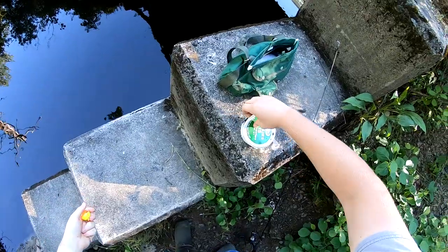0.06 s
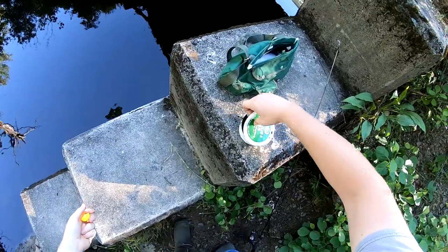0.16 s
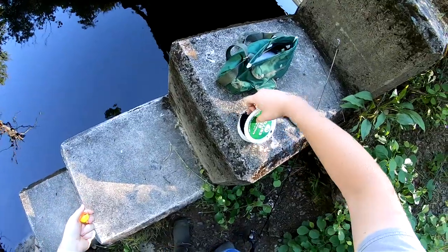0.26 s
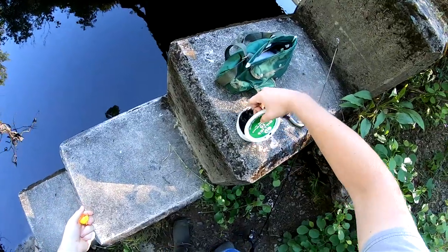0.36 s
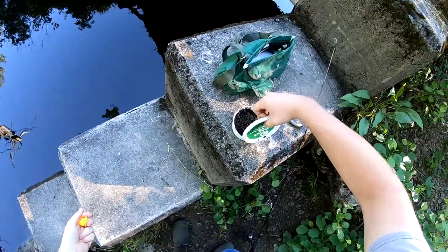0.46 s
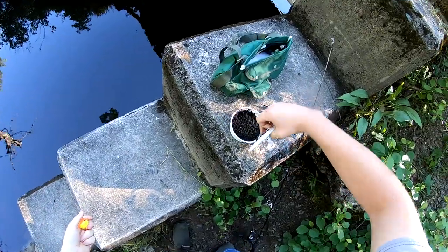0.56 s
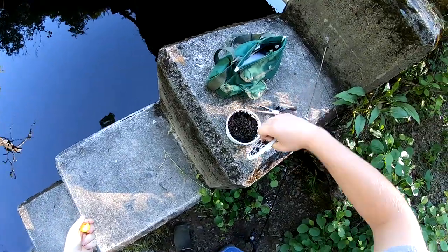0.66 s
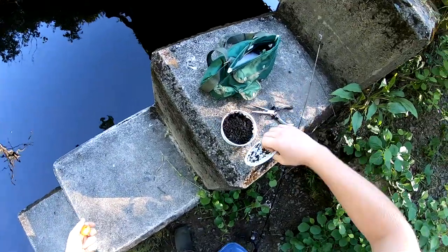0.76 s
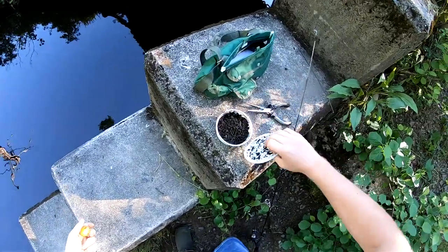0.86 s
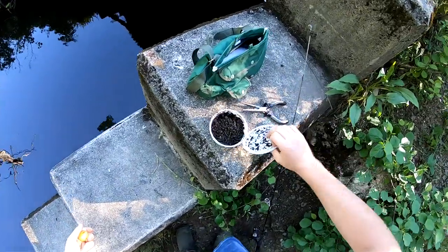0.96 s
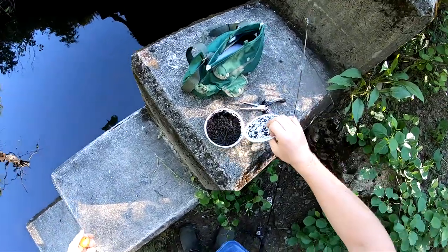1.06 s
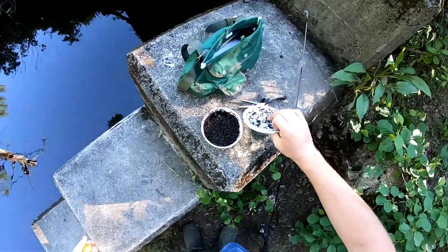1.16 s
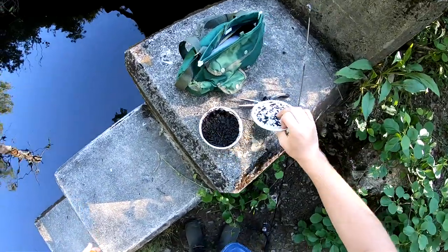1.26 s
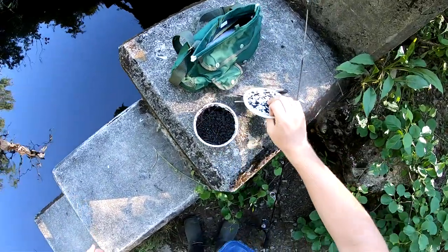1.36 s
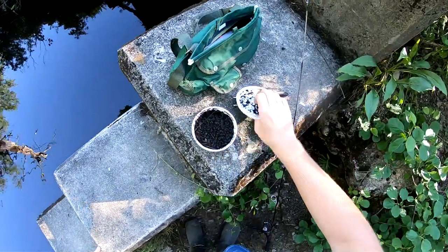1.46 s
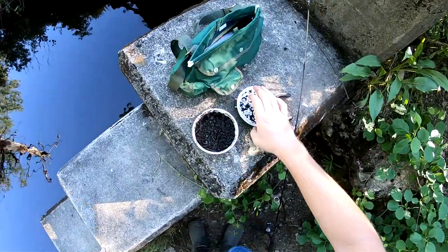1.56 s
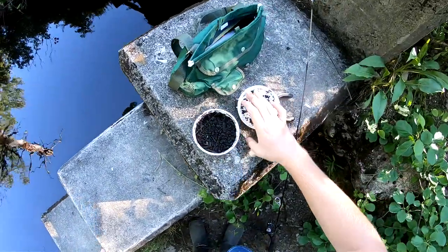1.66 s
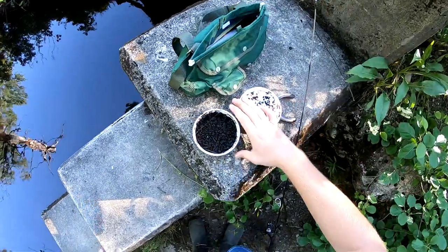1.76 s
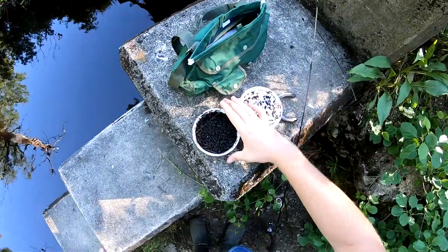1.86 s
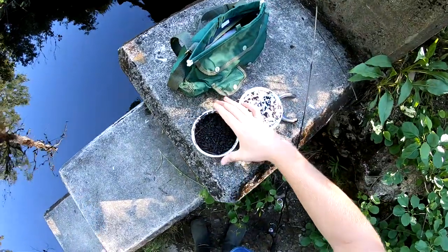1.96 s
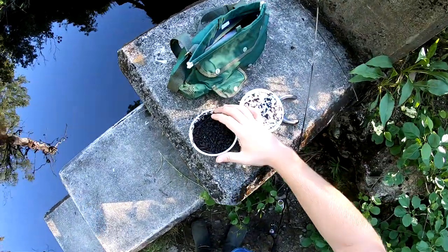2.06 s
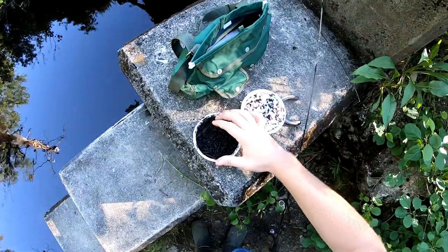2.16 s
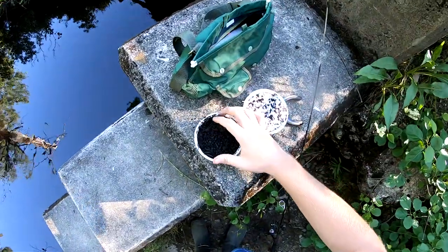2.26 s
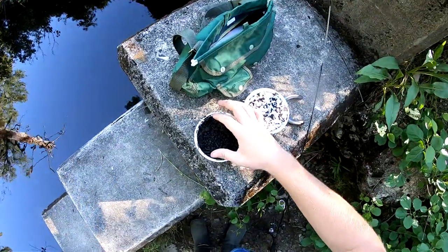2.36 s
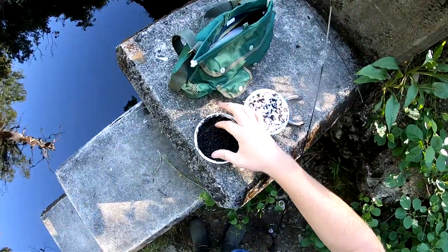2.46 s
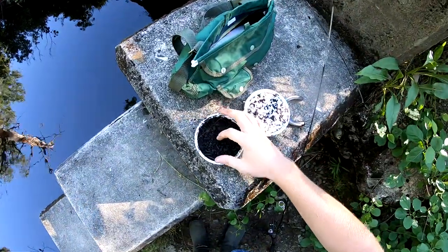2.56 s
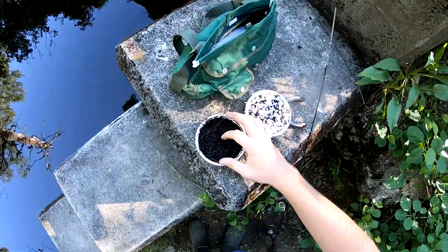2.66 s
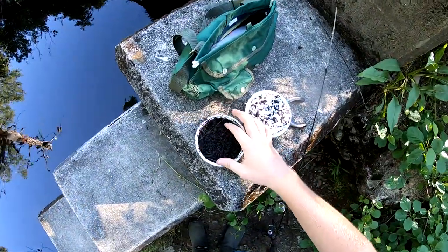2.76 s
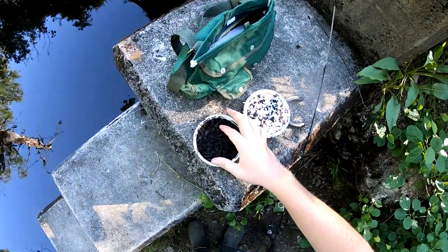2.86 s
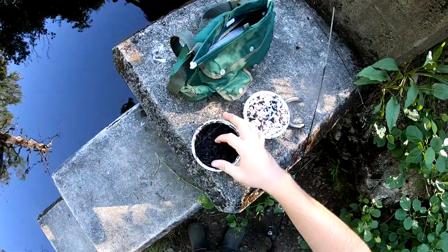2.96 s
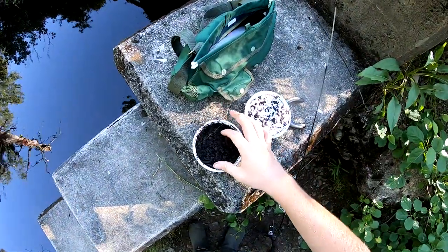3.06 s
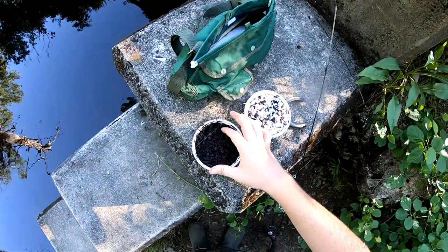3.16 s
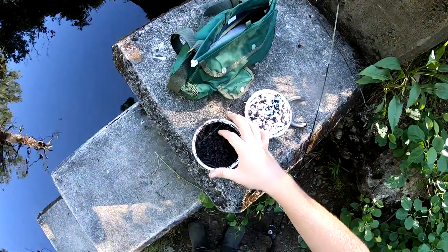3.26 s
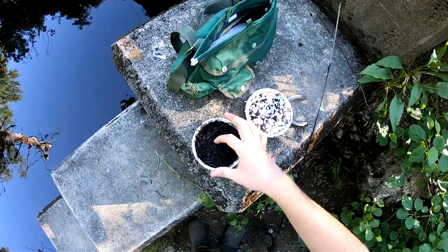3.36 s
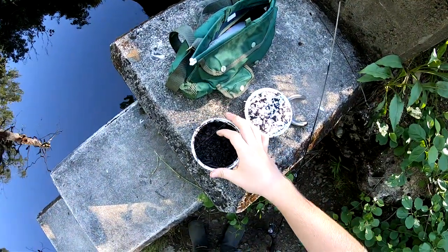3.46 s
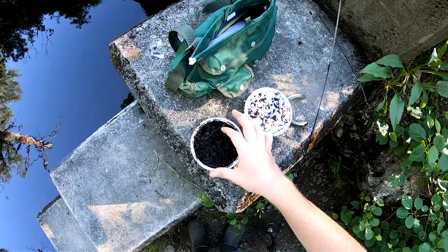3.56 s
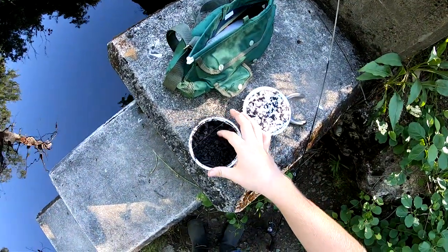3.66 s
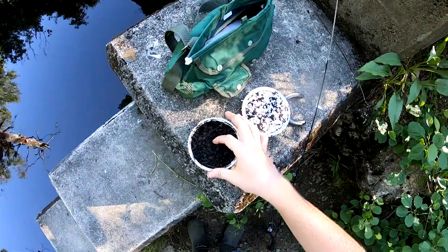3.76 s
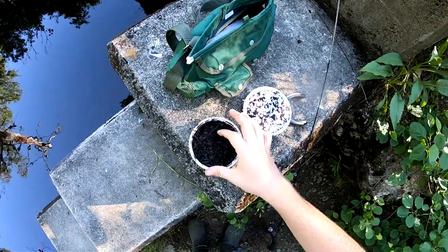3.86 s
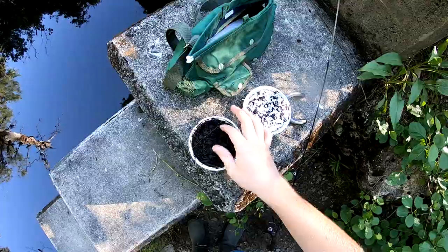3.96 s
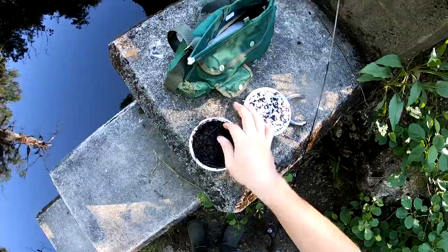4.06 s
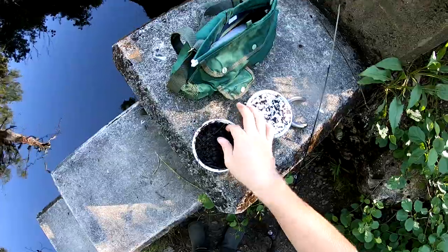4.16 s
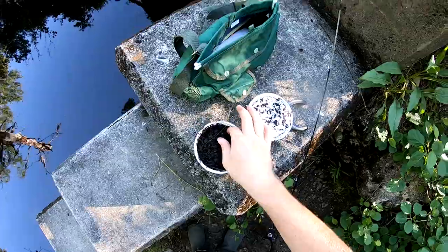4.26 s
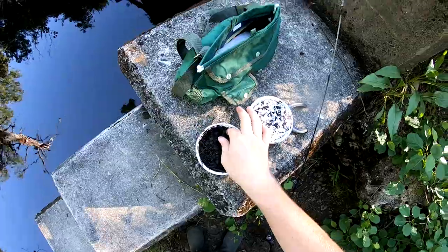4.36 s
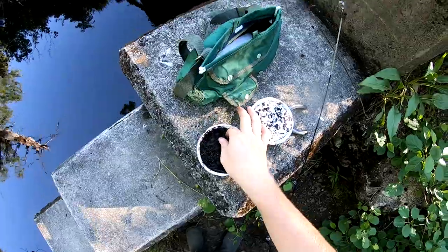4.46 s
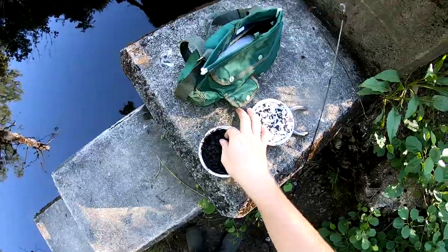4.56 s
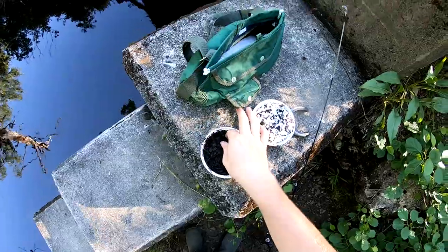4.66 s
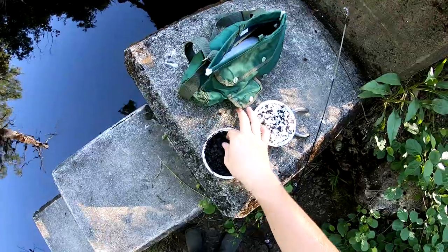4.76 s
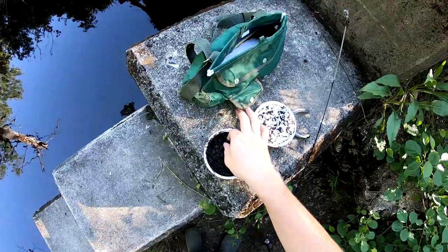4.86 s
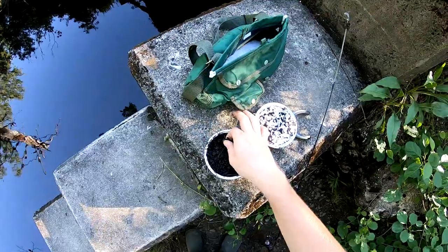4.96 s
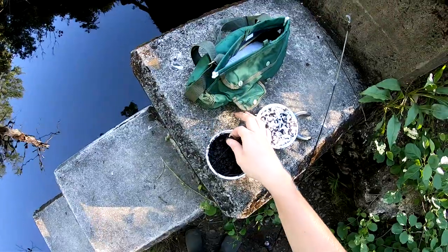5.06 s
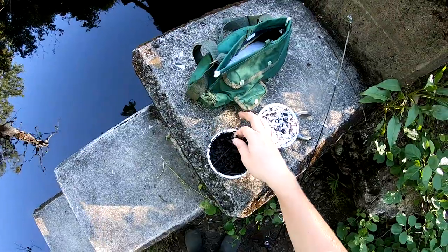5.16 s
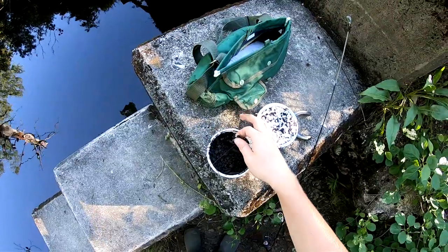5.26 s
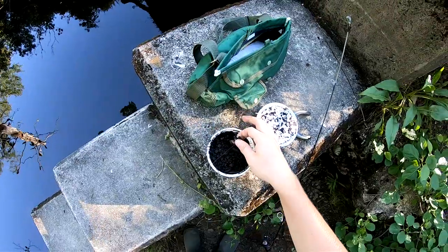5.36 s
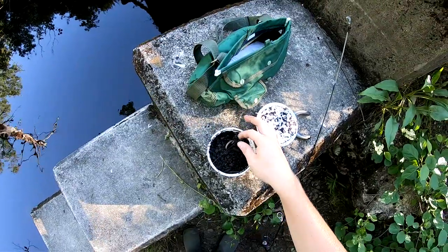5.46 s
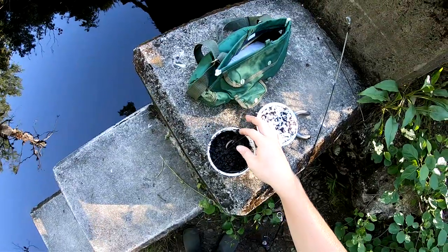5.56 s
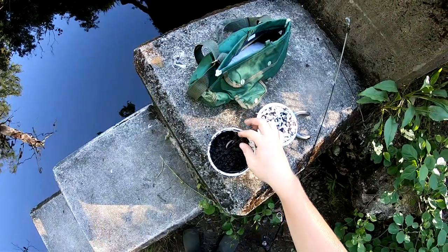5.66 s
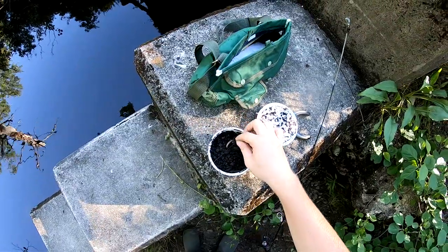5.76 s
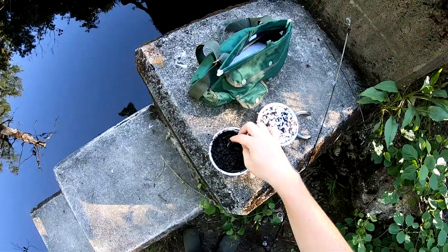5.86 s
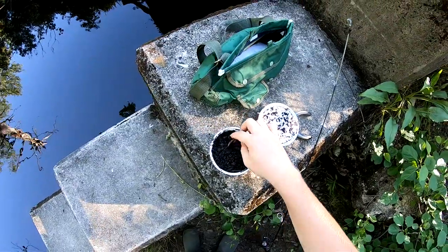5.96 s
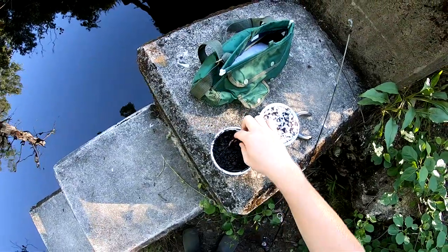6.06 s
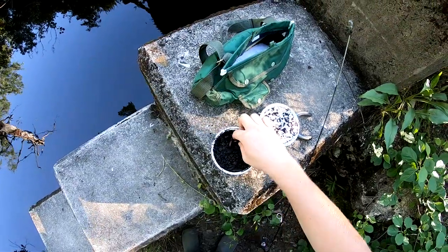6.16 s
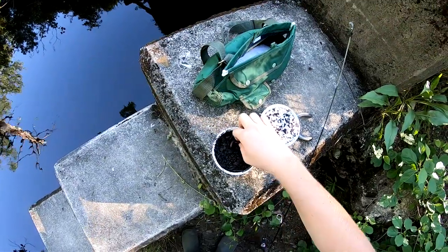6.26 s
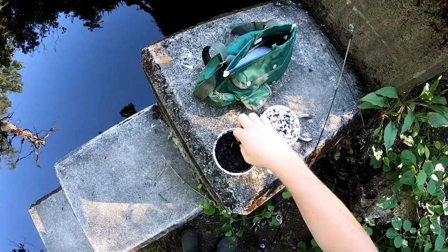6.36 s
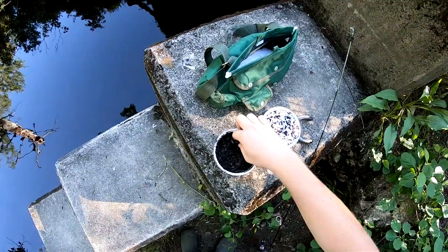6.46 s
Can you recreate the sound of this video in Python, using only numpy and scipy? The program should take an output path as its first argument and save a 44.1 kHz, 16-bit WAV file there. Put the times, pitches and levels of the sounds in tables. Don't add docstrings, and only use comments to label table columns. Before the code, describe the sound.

Close wearable stereo microphone, quiet open air: hard plastic cracks with hollow knocks come first, then cloth rubbing, another snap and a ringing rattle as the lid lands on a slab. After a lull, gritty scratching and tiny paired low-high ticks on a tub rim. Two birds whistle slurred notes with soft echoes from the trees; low puffs of breeze and steady faint water lie underneath.

```python
import sys
import numpy as np
from scipy import signal
from scipy.io import wavfile

SR = 44100
rng = np.random.default_rng(int(sys.argv[2]) if len(sys.argv) > 2 else 0)


def output_pcm(signal):
    pcm = np.clip(np.atleast_2d(signal).T, -1, 1) * 32767
    wavfile.write(sys.argv[1], SR, np.round(pcm).astype(np.int16))


def attenuation_scalar(level_db):
    decades = np.asarray(level_db, float) / 20
    return 10 ** decades


N = 287952
LID_OFF_S = 1.6
PORT_RING_HZ = 158


def rms_one(x):
    return x / np.sqrt(np.mean(x ** 2) + 1e-20)


def filtered(x, order, hz, kind="low"):
    return signal.sosfilt(signal.butter(order, hz, kind, fs=SR, output="sos"), x)


def in_time(rows):
    s, *columns = np.transpose(rows)
    return [np.interp(np.arange(N) / SR, s, c) for c in columns]


def at_hz(points, hz):
    point_hz, value = np.transpose(points)
    return np.interp(np.log(hz), np.log(point_hz), value)


def drift(rate):
    r = np.exp(-80 * np.pi * rate / SR)
    slow = signal.lfilter([1], [1, -2 * r, r * r], rng.standard_normal(N // 40 + 2002))[2000:]
    return np.interp(np.arange(N) / 40, np.arange(len(slow)), rms_one(slow))


def ring(clicks, hz, t60):
    r, w = attenuation_scalar(-60 / (t60 * SR)), 2 * np.pi * hz / SR
    return signal.lfilter([0, np.sin(w)], [1, -2 * r * np.cos(w), r * r], clicks + 1e-18)


def grains(per_s, spread_db):
    sizes = attenuation_scalar(spread_db * np.minimum(rng.exponential(1, N), 5)) * rng.choice([-1, 1], N)
    return sizes * (rng.random(N) < per_s / SR)


def swells(rows, rise_db_s, fall_db_s):
    t = np.arange(N) / SR
    efforts = []
    for s, hold, db in rows:
        rise = rise_db_s * np.maximum(s - t, 0)
        fall = fall_db_s * np.maximum(t - s - hold, 0)
        efforts.append(db - rise - fall)
    return np.max(efforts, axis=0)


def banded(white, spectrum, patchy_db, likeness):
    out, together = 0, drift(4)
    bottom, top = np.array(spectrum)[[0, -1], 0]
    edges = bottom * 2 ** np.arange(0, np.log2(top / bottom) + .2, .5)
    for k, (low, high) in enumerate(zip(edges, np.minimum(edges[1:], .45 * SR))):
        mid, side = filtered(white[k % 2], 2, [low, high], "band")
        hz = np.sqrt(low * high)
        alike = np.clip(at_hz(likeness, hz), -1, 1)
        flicker_db = patchy_db * (.7 * together + drift(15))
        gain = attenuation_scalar(at_hz(spectrum, hz) + flicker_db)
        out = out + gain * (np.sqrt(1 + alike) * mid + np.sqrt(1 - alike) * side * [[1], [-1]])
    return rms_one(out)


# pitch_hz, level_db
TUB_MODES = [(330, -19), (560, 0), (820, 5), (1050, 7), (1250, -2)]
# pitch_hz, level_db
LOOSE_MODES = [(800, -3), (1050, 0.5), (1450, -10), (1750, 9.5), (2200, -19.5)]
# delay_s, level_db
SLAB_ECHOES = [
    (.0021, -9),
    (.0036, -8),
]


def hits(events, crack_top_hz, cycles, thud_t60, tail_db, pan_db, shade_db):
    size = 1536
    out, t = np.zeros((2, N + size)), np.arange(size) / SR
    chance = rng.standard_normal
    for s, db, hz, thud_db, crack_db, rattle_ms in events:
        fade = np.exp(-1300 * t / max(rattle_ms, 1))
        kick = attenuation_scalar(tail_db) * chance(size) * np.abs(chance(size)) * fade
        kick[0] = 1
        for lag_s, echo_db in SLAB_ECHOES:
            lag = round(lag_s * SR * attenuation_scalar(chance()))
            kick[lag] += attenuation_scalar(echo_db + shade_db + 1.5 * chance()) * np.sign(chance())

        contact = ring(np.diff(kick, prepend=0), hz, 3 / hz)
        plate = ring(contact, hz, cycles / hz)

        thud = 0
        for mode_hz, mode_db in TUB_MODES if s < LID_OFF_S else LOOSE_MODES:
            uneven_db = 3 * chance() + 2 * chance() * np.array([[1], [-1]])
            thud = thud + attenuation_scalar(mode_db + uneven_db) * ring(kick, mode_hz * attenuation_scalar(.4 * chance()), thud_t60)
        if s > LID_OFF_S:
            thud = filtered(thud, 4, 720, "high") + attenuation_scalar(db / 2) * ring(kick, 220, 0.061)

        crack = [np.roll(kick, 1), kick] + .11 * chance((2, size)) * fade
        crack = filtered(crack, 2, [4200, crack_top_hz], "band")

        thud_at_ports = np.array([thud[0], np.roll(thud[1], 3)]) / np.abs(thud).max()
        body = plate / np.abs(plate).max() + attenuation_scalar(thud_db) * thud_at_ports
        lean_db = (pan_db + chance()) / 2
        sound = body * attenuation_scalar([[lean_db], [-lean_db]]) + attenuation_scalar(crack_db) * crack / np.abs(crack).max()
        i = round((s + .0011) * SR)
        out[:, i:i + size] += attenuation_scalar(db) * sound / np.abs(sound.mean(0)).max()
    return filtered(out[:, :N], 4, [185, 17500], "band")


# start_s, peak_db, ring_hz,
# thud_db and crack_db (relative to the ring)
PRYING = [(0.004, -23, 650, 8, -3), (0.027, -6.5, 2800, -2.5, 1.5), (0.137, -34, 1570, 7, -28),
          (0.1562, -21.5, 2630, -7, -3.5), (0.1704, -26, 2050, -1, -4), (0.1753, -19, 530, 9.5, -21),
          (0.1923, -34, 1210, 12, 28), (0.193, -12, 2020, 9.5, -4), (0.2015, -21.5, 1170, 11, 9),
          (0.197, -18, 950, -22, -25), (0.21, -36, 2490, 12, -13.5), (0.239, -32.5, 2500, -22, 0),
          (0.249, -29.5, 1300, 29, -21), (0.2595, -28.5, 480, -6, -9), (0.272, -23, 1200, 21.5, 10.5),
          (0.294, -39, 3200, 9, -6), (0.3171, -27.5, 3130, 5, -8), (0.305, -30.5, 1370, 26, -14),
          (0.322, -33, 1290, 1, -20), (0.342, -48, 1200, 0, -11), (0.52, -37, 2540, 0, -3),
          (0.526, -35, 1390, -1, 2), (0.535, -47, 1800, -17, -12), (0.55, -18, 2720, -41, -5),
          (0.579, -33.5, 2980, -32, 0), (1.2128, -10.5, 9500, -26, -6.5), (1.4577, -34.5, 2480, 4, -18),
          (1.521, -35.5, 1510, -24, -35.5), (1.535, -5.5, 2400, -1, 10.5)]
# start_s, peak_db, ring_hz, rattle_ms, crack_db (relative to the ring)
CLATTER = [(1.636, -12.5, 2570, 2.8, 4.5), (1.647, -5.5, 3690, 5.8, -2), (1.658, -26.5, 2440, 3.4, -2.5),
           (1.661, -23.5, 2500, 4.8, -2.5), (1.6675, -23, 1790, 24, 7), (1.678, -9.5, 3400, 4.7, 1),
           (1.687, -19.5, 3700, 9.3, -2.5), (1.716, -31, 2070, 4.2, 1.5), (1.7223, -15, 3500, 6.6, -0.5),
           (1.749, -18.5, 3500, 3.4, 0.5), (1.8081, -22.5, 1900, 7.9, -16), (1.8096, -22.5, 2310, 4.5, 4.5),
           (1.823, -32, 2870, 8.5, -15), (1.834, -30.5, 1520, 5.3, 0), (1.8442, -31.5, 2500, 9.5, -3),
           (1.87, -33, 1940, 2, 4), (1.957, -34.5, 1930, 1.5, -9), (1.966, -39, 1520, 9.7, -14),
           (1.991, -34, 3200, 1.8, -4), (2.0598, -30, 3400, 2.2, -4.5), (2.0608, -36.5, 1220, 3, -13),
           (2.086, -36.5, 1930, 3, -9), (2.124, -39, 3300, 10, -1), (2.191, -35.5, 2920, 2, -12),
           (2.1983, -33.5, 3330, 1.5, -13.5), (2.203, -10.5, 2930, 4.5, -2), (2.215, -33.5, 2700, 8.1, -7),
           (2.233, -35, 3460, 4.5, -9), (2.246, -43, 2000, 4.7, -13), (2.2531, -32, 2900, 2.1, -17),
           (2.261, -24.5, 2770, 2.3, -7), (2.2639, -19.5, 3080, 5.5, -4), (2.282, -35, 2120, 4.7, 1),
           (2.294, -31.5, 2980, 1.5, -13), (2.3, -37, 2760, 2.5, -19), (2.31, -37, 3400, 2, -1.5),
           (2.344, -42.5, 1704, 1.7, -9), (2.361, -48, 3000, 1.5, -10), (2.387, -46.5, 3040, 1.6, 3.5)]


def lid():
    pried = [row + (4.0 - .12 * (row[1] + 20),) for row in PRYING]
    loose_thud_db = -13
    loose = [(s, db, hz, loose_thud_db, crack_db, ms) for s, db, hz, ms, crack_db in CLATTER]
    return hits(pried + loose, crack_top_hz=9300, cycles=5, thud_t60=.021, tail_db=-20, pan_db=-2.0, shade_db=0)


# start_s, peak_db, ring_hz
DIGGING = [(2.923, -55, 1334), (2.942, -48, 1300), (2.967, -39, 2700), (2.9773, -34, 2750),
           (2.982, -43.5, 1310), (3.007, -46, 2600), (3.02, -38, 2880), (3.028, -36, 2700),
           (3.038, -41, 2700), (3.04, -40, 2500), (3.044, -42, 1500), (3.051, -33.5, 1750),
           (3.058, -35, 1320), (3.0675, -34, 2390), (3.072, -39, 3000), (3.082, -29, 3450)]
# start_s,
# peak_db, ring_hz
FLICKS = [(3.185, -37.5, 1770), (3.219, -31, 3350), (3.306, -41.5, 1740), (3.331, -33.5, 3270),
          (3.35, -46, 5200), (3.361, -37, 6000), (3.394, -34, 3100), (3.447, -44, 2930),
          (3.459, -34.5, 1800), (3.467, -34.5, 2800), (3.493, -27.5, 3460), (3.594, -38, 1770),
          (3.626, -31, 3450), (3.714, -39, 1890), (3.74, -32, 3410), (3.803, -42.5, 1940),
          (3.82, -34.5, 3380), (3.861, -43.5, 1790), (3.871, -46, 1690), (3.875, -35.5, 2920),
          (3.905, -40, 2600), (3.932, -44.5, 3000)]
# start_s, peak_db, ring_hz, thud_db (relative to the ring)
PICKS = [(4.232, -46, 3780, -23.5), (4.258, -40, 2860, -12), (4.335, -41, 4250, -44.5),
         (4.623, -39, 3280, -22), (4.662, -39, 2730, -34), (4.694, -43, 3120, -8),
         (4.859, -36.5, 3020, -41), (5.019, -34, 2850, -24), (5.24, -46, 1510, 14),
         (5.253, -41.5, 2860, -21), (5.281, -49.5, 2830, 10.5), (5.644, -45, 1843, 12.5),
         (6.166, -61, 1500, -7), (6.202, -56, 2514, -15.5), (6.349, -57.5, 1445, -16),
         (6.478, -51.5, 1400, 1)]


def fingers():
    rim_thud_db, rattle_ms = -13, 2.5
    ticks = [row + (rim_thud_db,) for row in DIGGING + FLICKS] + PICKS
    rows = []
    for s, db, hz, thud_db in ticks:
        crack_db = -6.5 + 0.23 * (db + 36)
        rows.append((s, db, hz, thud_db, crack_db, rattle_ms))
    return hits(rows, crack_top_hz=7000, cycles=4.5, thud_t60=0.004, tail_db=-24, pan_db=-2.2, shade_db=-5)


def slips(level_db, modes, per_s, spread_db, t60):
    clicks = grains(per_s, spread_db)
    body = sum(attenuation_scalar(db) * ring(clicks * rng.standard_normal(N), hz, t60) for hz, db in modes)
    body = filtered(body, 4, [200, 9000], "band")
    return attenuation_scalar(level_db) * rms_one(body) * attenuation_scalar([[-1.0], [1.0]])


# start_s, hold_s, level_db
CREAKS = [
    (0, 0.01, -35.5),
    (.165, .02, -43),
    (.19, .002, -36.5),
    (.215, 0.069, -44),
    (.3, 0.079, -62),
    (1.09, 0.011, -40),
    (1.13, 0.014, -49),
]
# start_s, hold_s, level_db
GRIT = [
    (2.97, 0.075, -62.5),
    (3.05, 0.029, -56),
    (3.47, 0.015, -60.5),
    (3.88, 0.0032, -61),
]
# pitch_hz, level_db
WALL_MODES = [(1050, -16.5), (1700, -13.5), (2700, -1.5), (3600, -12), (5200, -18), (7200, -15)]


def creak():
    flex_db = swells(CREAKS, rise_db_s=500, fall_db_s=600)
    flex = slips(flex_db, TUB_MODES[:4] + WALL_MODES[1:3], 1500, 2.5, .012)
    grit_db = swells(GRIT, rise_db_s=406, fall_db_s=794.5)
    return flex + slips(grit_db, WALL_MODES, 2200, 2.5, 0.004)


# pitch_hz, level_db (per Hz)
CLOTH = [(180, -24.5), (300, 0), (701, -5), (842, 4.5), (1460, 1.5), (1690, 2.5), (3130, 0.5), (7600, -5),
         (12700, -22), (16000, -37)]
# pitch_hz, left-right likeness (-1 to 1)
NEAR_ALIKE = [(40, .6), (200, .85), (500, .92), (1000, .85), (4000, .9), (7500, .55), (11000, .3)]
# time_s, level_db
ARM = [(0, -63.5), (.33, -63.5), (.44, -74), (.645, -73.5), (.7, -61), (1.2, -54.5), (1.7, -61),
       (2.15, -68.5), (2.3, -67), (2.4, -76.5), (2.56, -99), (2.63, -74), (4.5, -82.5), (4.62, -71),
       (5.05, -66.5), (5.35, -80), (5.7, -82.5), (6.05, -76.5), (6.53, -81)]
# start_s, hold_s, rub_db, bump_db (on the ports, relative to the rub)
STROKES = [(0, 0.043, -51, 4.5), (0.197, .01, -79, 6), (0.33, 0.014, -84, 28.5),
           (0.556, 0.0038, -52.5, -15), (0.773, 0.01, -51.5, -30), (0.838, 0.13, -51, -16),
           (1.007, 0.066, -46, -22), (1.096, 0.045, -44, 5), (1.201, 0.0079, -46, -22),
           (1.31, 0.02, -43, -10), (1.553, 0.0037, -55.5, 9), (2.044, .01, -62, -15),
           (2.132, 0.0085, -64, -27), (2.93, 0.0067, -62.5, -17.5), (3.348, 0.015, -66, -22.5),
           (4.301, 0.07, -80.5, -16.5), (4.834, 0.027, -66, -3), (5.423, 0.012, -72.5, -9),
           (5.726, 0.0095, -75.5, -11)]
STROKE_RISE_DB_S, STROKE_FALL_DB_S = 349, 404.5


def sleeve():
    arm_db, = in_time(ARM)
    stroke_db = swells([row[:3] for row in STROKES], STROKE_RISE_DB_S, STROKE_FALL_DB_S)
    rub_db = np.maximum(arm_db, stroke_db)
    sheen_db = 4 + .35 * (arm_db + 65)
    white = rng.standard_normal((2, 2, N)) * (1 + 0.17 * np.abs(grains(1500, 4.5)))
    cloth = filtered(banded(white, CLOTH, 1.2, NEAR_ALIKE), 10, 14900)
    dull = filtered(cloth, 2, 3000)
    top = filtered(cloth, 2, 8000, "high")
    cloth = cloth + (attenuation_scalar(0.033 * (rub_db + 85.5)) - 1) * top
    lean = attenuation_scalar([[-1.5], [1.5]])
    return attenuation_scalar(rub_db + 1.0) * (dull * lean + attenuation_scalar(sheen_db) * (cloth - dull))


# pitch_hz, level_db (per Hz)
BUMP = [(130, -1.5), (155, 0), (220, -0.5), (600, -6), (900, -9), (1200, -32.5)]
# pitch_hz, level_db (per Hz)
BREEZE = [(150, -5), (240, -1), (400, -9.5)]
# start_s, hold_s, level_db
GUSTS = [
    (1.0, 0.8, -63),
    (1.7, 0.56, -64),
    (2.63, 0.25, -66.5),
    (4.62, 0.71, -61),
    (5.95, 0.75, -68.5),
]


def port_lumps():
    bumps = [(s, hold, db + rel_db) for s, hold, db, rel_db in STROKES]
    knock_db = swells(bumps, STROKE_RISE_DB_S, STROKE_FALL_DB_S)
    gust_db = swells(GUSTS, rise_db_s=121, fall_db_s=50)
    calm_db = np.full(N, -73.5)
    lump_db = np.max([knock_db, gust_db, calm_db], axis=0)
    hum = attenuation_scalar(knock_db - 4) * np.sin(2 * np.pi * PORT_RING_HZ * np.arange(N) / SR)
    port = signal.cheby1(6, 3, 146, "high", fs=SR, output="sos")
    rumble = filtered(rng.standard_normal(N), 2, [45, 120], "band")
    lumps = banded(rng.standard_normal((2, 2, N)), BUMP, 3.0, NEAR_ALIKE)
    lumps = lumps + attenuation_scalar(1.5) * signal.lfilter(*signal.iirpeak(PORT_RING_HZ, 7, fs=SR), lumps)
    lumps = signal.sosfilt(port, lumps) + attenuation_scalar(-25.5) * rms_one(rumble)
    breeze = signal.sosfilt(port, banded(rng.standard_normal((2, 2, N)), BREEZE, 3.6, FAR_ALIKE))
    lumps = np.where(np.arange(N) < 2.33 * SR, lumps, breeze)
    return attenuation_scalar(lump_db) * lumps + hum


def whistle(notes):
    rows = []
    for note in notes:
        (s0, hz0, _), (s1, hz1, _) = note[0], note[-1]
        rows += [(s0 - .005, hz0, -130)] + note + [(s1 + .005, hz1, -130)]
    hz, db = in_time(rows)
    phase = 2 * np.pi * np.cumsum(hz * (1 + .022 * drift(90))) / SR
    return np.sqrt(2) * attenuation_scalar(db + 1.5 * drift(60)) * np.sin(phase)


# time_s (from the down-slur), pitch_hz, level_db
PHRASE = [
    [(-.096, 7400, -22), (-.088, 6300, -10), (-.078, 5500, -10), (-.07, 5100, -20)],
    [(-.004, 5350, -20), (.006, 4800, -8), (.02, 4100, -2), (.036, 3300, -4), (.044, 3000, -14)],
    [(.056, 3000, -12), (.064, 3300, -3), (.076, 3750, 0), (.088, 4250, -5), (.094, 4550, -16)],
]
# start_s, level_db
REPEATS = [
    (3.562, -59.5),
    (3.818, -57.5),
    (4.06, -57),
    (4.313, -55),
    (4.569, -55),
    (4.828, -54),
    (5.096, -52.5),
]


def first_bird():
    notes = []
    for start, level_db in REPEATS:
        for slur in PHRASE:
            notes.append([(start + s, hz, db + level_db) for s, hz, db in slur])
    return whistle(notes)


# start_s, length_s, from_hz, to_hz, level_db
SLURS = [(0.244, .04, 3210, 3287, -53), (0.29, .03, 3300, 3200, -61.5), (0.324, 0.04, 3300, 3714, -57.5),
         (0.355, 0.027, 2996, 3074, -53), (0.381, 0.025, 2920, 2678, -53), (0.404, .03, 3394, 2910, -61),
         (0.469, .035, 3062, 2899, -56), (2.407, 0.037, 4048, 3345, -65.5),
         (2.449, 0.047, 3130, 2497, -65.5), (2.515, 0.048, 3304, 2462, -63), (3.09, 0.03, 3902, 3490, -64),
         (3.136, .035, 4306, 2600, -62), (3.18, .04, 2850, 3616, -52), (3.228, 0.03, 3600, 2508, -61),
         (3.287, .03, 3704, 2700, -65.5), (3.379, 0.032, 3500, 2810, -61), (3.659, 0.033, 3012, 2610, -60),
         (3.922, 0.04, 3297, 2600, -63), (5.482, 0.051, 3100, 2768, -68), (5.612, .03, 1856, 1559, -69),
         (5.65, .15, 1588, 1531, -73), (5.799, 0.16, 4170, 5180, -78.5), (6.008, 0.14, 4860, 4200, -76),
         (6.325, .045, 3850, 4880, -72), (6.376, 0.027, 3100, 3970, -64.5), (6.421, 0.012, 5320, 4296, -64),
         (6.439, 0.015, 4055, 3312, -58.5), (6.46, 0.014, 3420, 2510, -57), (6.485, 0.016, 4300, 3252, -63),
         (6.509, 0.021, 3405, 2875, -58)]
# time_s, pitch_hz
SONG = [
    [(5.1, 3000), (5.135, 2450), (5.172, 3800), (5.19, 2900), (5.215, 2250), (5.26, 3050), (5.29, 2900)],
    [(5.318, 3000), (5.35, 2350), (5.372, 2300)],
    [(5.392, 2500), (5.418, 3150), (5.442, 2500), (5.468, 3200)],
]


def second_bird():
    slurs = []
    for s, length, hz0, hz1, db in SLURS:
        slurs.append([(s, hz0, db - 3), (s + length / 2, (hz0 + hz1) / 2, db), (s + length, hz1, db - 3)])
    song_start = SONG[0][0][0]
    song = [[(s, hz, -62.5 - 3 * (s - song_start)) for s, hz in run] for run in SONG]
    return whistle(slurs), whistle(song)


def birds():
    trees_t60_s, leaves_t60_s = 0.77, .03
    first = first_bird()
    hidden, second = second_bird()
    t = np.arange(SR) / SR
    common, own = rng.standard_normal(SR), rng.standard_normal((2, SR))
    scatter = (common + own) * attenuation_scalar(-60 * t / trees_t60_s) * (1 - np.exp(-t / 0.0021))
    scatter /= np.sqrt(np.sum(scatter ** 2) / 2)
    sent = first + attenuation_scalar(-6) * hidden + attenuation_scalar(-7) * second
    echoes = signal.fftconvolve(sent[None], scatter)[:, :N]
    first = attenuation_scalar(-3) * filtered(first, 6, 5000)
    direct = first * attenuation_scalar([[.5], [-.5]]) + (second + attenuation_scalar(-6) * hidden) * attenuation_scalar([[-.6], [.6]])
    leaves = (own[::-1] * attenuation_scalar(-60 * t / leaves_t60_s))[:, :SR // 8]
    leaves = attenuation_scalar(-6) * leaves / np.sqrt(np.sum(leaves ** 2) / 2)
    blurred = signal.fftconvolve(direct, leaves, axes=1)[:, :N]
    return attenuation_scalar(-1) * direct + blurred + attenuation_scalar(2.0) * echoes


# pitch_hz, level_db (per Hz)
AIR = [(12, -35.5), (20, -2), (111, -17.5), (147, 4.5), (294, -2.5), (421, -20), (571, -6), (865, -4.5),
       (2340, -19), (2850, -11.5), (3460, -16), (4900, -12.5), (5800, -22), (15000, -49.5)]
# pitch_hz, left-right likeness (-1 to 1)
FAR_ALIKE = [(40, .5), (200, -.4), (1000, -.5), (2000, 0), (4000, .3), (10000, 0)]


def far_air():
    return attenuation_scalar(-68) * banded(rng.standard_normal((2, 2, N)), AIR, 1.0, FAR_ALIKE)


def scene():
    return lid() + fingers() + creak() + sleeve() + port_lumps() + birds() + far_air()


def band_limit(x):
    return signal.sosfilt(signal.butter(12, 16870, fs=SR, output="sos"), x)


def record(dry):
    dry = dry - .45 * signal.lfilter(*signal.iirpeak(8500, 6, fs=SR), dry)
    step_hz = 10100
    low = filtered(dry, 8, step_hz)
    high = filtered(dry, 8, step_hz, "high")
    high = high + attenuation_scalar(10) * filtered(high, 2, 12500, "high")
    mix = filtered(low + attenuation_scalar(-21.5) * high, 8, 15600)
    return band_limit(mix)


dry = scene()
out = record(dry)
output_pcm(out)
```